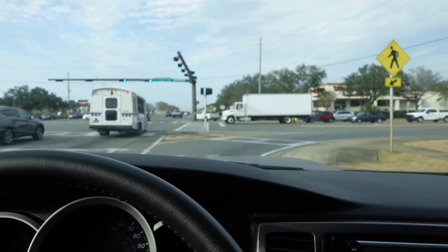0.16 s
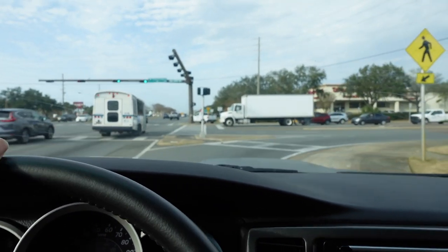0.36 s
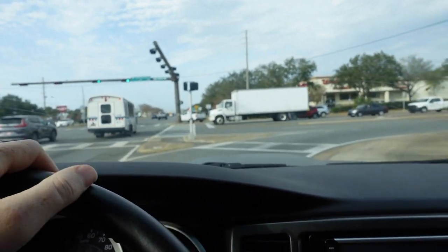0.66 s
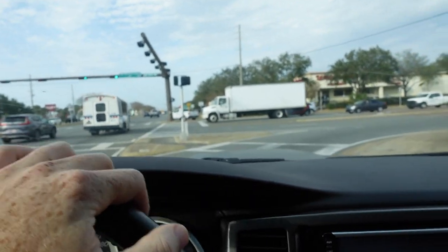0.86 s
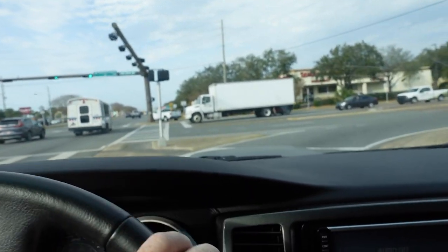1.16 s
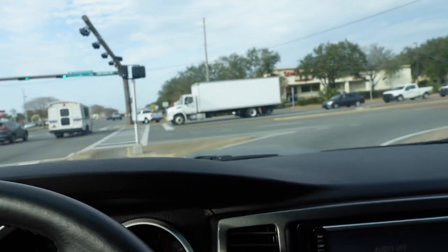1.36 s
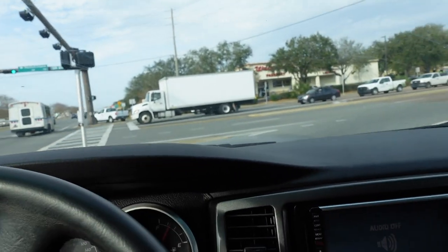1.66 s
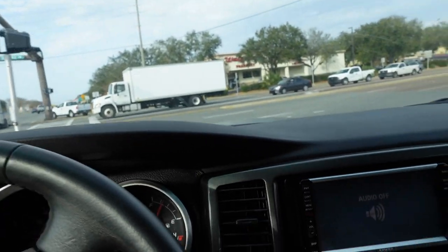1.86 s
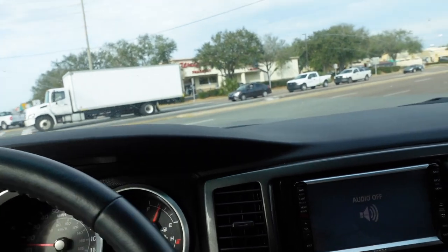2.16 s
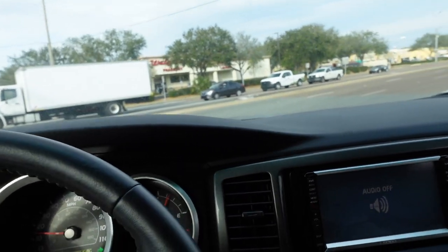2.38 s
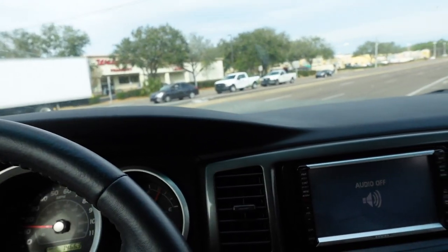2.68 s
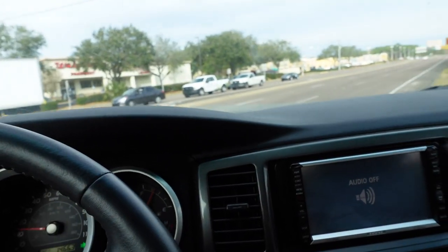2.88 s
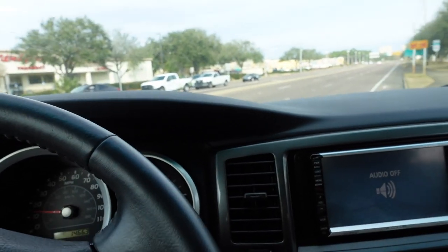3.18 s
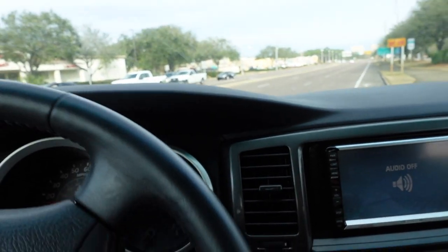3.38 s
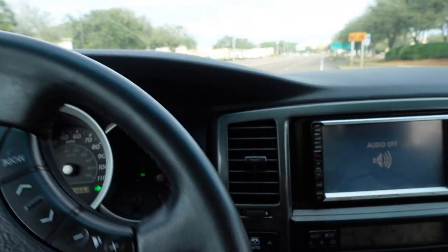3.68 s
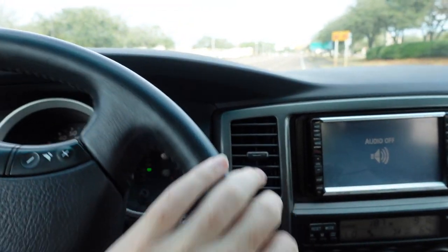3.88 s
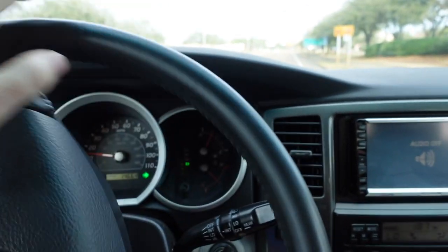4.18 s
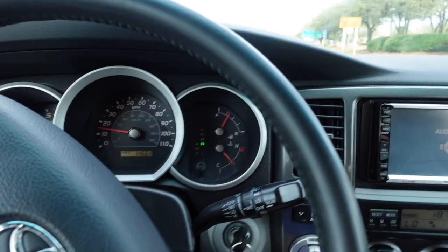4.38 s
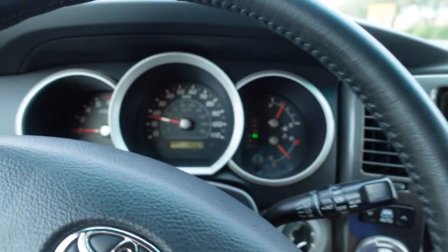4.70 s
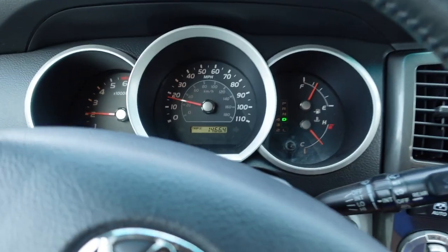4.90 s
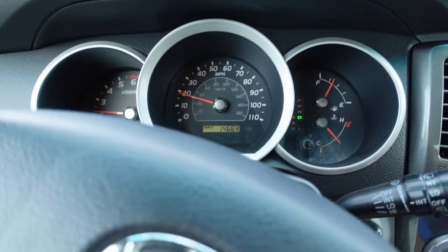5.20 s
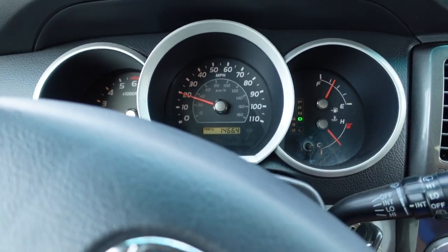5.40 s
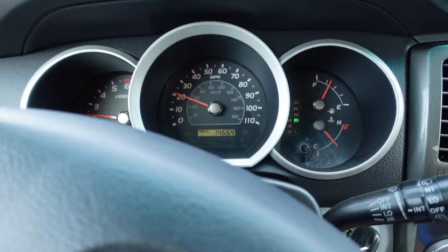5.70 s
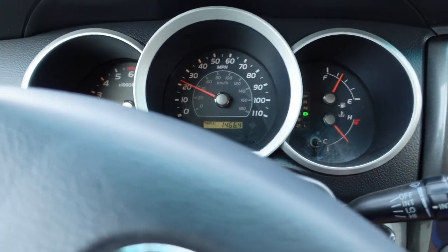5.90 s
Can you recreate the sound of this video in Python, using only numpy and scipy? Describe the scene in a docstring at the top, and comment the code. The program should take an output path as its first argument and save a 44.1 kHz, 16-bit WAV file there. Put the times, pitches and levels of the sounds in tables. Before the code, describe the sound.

Inside a truck cabin, close and dry, from the driver's seat. From 0 s a hand brushes the wheel over low road rumble and faint hiss; an indicator relay starts at 0.1 s, a light tick then a woodier tock, about three strokes per second. Small creaks follow, and a sharp, loud plastic click at 0.98 s. The vehicle slows, and the tyre hum dips in pitch but swells, wavering, around 2.7 s. Dull suspension knocks come from 1.7 to 2.5 s and at 3.4 s. From 3.3 s the V8 rises, a droning boom with thin air whistles. At 4.2 s growl catches; at 4.4 s the stalk snaps back in a rapid loud clatter, ticking ends, and the hand slides on the rim. Until 6 s the engine climbs steadily, throaty and uneven, with metallic valve noise, fluttering whistles, rising tread hum and occasional creaks.

```python
"""Truck cabin in a turn

Heard from the driver's seat of an eight-cylinder truck that slows into a turn and then pulls away.
Firing pulses ring exhaust, intake and metal and boom in the cabin; air whistles past the throttle plate.
Close tones make the tread hum, shaped noise the road, and short bursts with decaying modes the clicks:
the relay ticks until the steering cam snaps the stalk back, while a hand slides and creaks on the rim."""
import sys
import numpy as np
from scipy import signal
from scipy.fft import rfft, irfft, next_fast_len
from scipy.io import wavfile
from scipy.ndimage import uniform_filter1d

SR = 44100
rng = np.random.default_rng(int(sys.argv[2]) if len(sys.argv) > 2 else 0)


def wrap_up_sound(samples):
    """Save the sound to the file named by the first command line argument, as 16-bit audio."""
    columns = np.atleast_2d(samples).T
    # keep every value between -1 and 1, then stretch to whole-number steps
    tamed = np.clip(columns, -1, 1)
    steps = np.round(tamed * 32767).astype(np.int16)
    wavfile.write(sys.argv[1], SR, steps)


N = 266805
TIME = np.arange(N) / SR  # s

# Engine speed. Each row: time in seconds, firing rate in Hz.
ENGINE_SPEED = [(3.3, 100), (3.8, 109.5), (4.19, 113.5), (4.37, 137), (4.8, 145), (5.3, 154.6),
                (6.05, 166.4)]
# The truck slows and pulls away. Each row: time in seconds, road speed in m/s.
ROAD_SPEED = [(0, 8.7), (.7, 8.14), (1.75, 6.76), (3.2, 6.25), (4, 7.25), (5.25, 9.56), (6.05, 11.7)]
CANCEL_S = 4.39  # the indicator cancels


def engine():
    """Firing pulses ring pipes and metal, and the firing rate itself booms in the cabin."""
    rate_hz, = curves(ENGINE_SPEED)
    phase = np.cumsum(rate_hz) / SR  # in firings
    pulses = firing_pulses(phase)
    body = pipes(pulses) + boom(rate_hz, phase)
    # sound that goes round the cabin arrives from the side, a quarter wave late
    late = np.imag(signal.hilbert(body))
    return spread(body, late) + valve_gear(pulses, phase, rate_hz)


def firing_pulses(phase, jitter_ms=.045, drift_db=1.5):
    """Eight uneven cylinders fire in turn, each a little early or late and with a drifting strength."""
    # In firing order. Each row: strength in dB, travel time along the manifold in ms.
    cylinders = [(4.5, 1.02), (5.5, 1.03), (-0.5, 0.086), (5, 0.53), (2.5, 1.446), (6.5, 1.2), (6.5, 1.055),
                 (2, 0.033)]
    count = len(cylinders)
    firing = np.arange(int(phase[-1]) - 2)
    strength_db, lag_ms = np.array(cylinders)[firing % count].T
    lag_ms = np.abs(lag_ms + jitter_ms * rng.standard_normal(len(firing)))
    cycles = rng.standard_normal((len(firing) // count + 1, count))
    slow_drift = unit(uniform_filter1d(cycles, size=4, axis=0)).ravel()[firing]
    strength_db = strength_db + drift_db * slow_drift + rng.uniform(-1.2, 1.2, len(firing))
    at = (np.interp(firing, phase, TIME) + lag_ms / 1000).clip(0) * SR
    return unit(np.bincount(at.astype(int), undb(strength_db), N))


def pipes(pulses, gas=.16, surge_db=1.3):
    """Pulses and turbulent gas ring exhaust and intake; uneven combustion makes each pipe surge."""
    # Exhaust as it comes through the body. Each row: frequency in Hz, relative level in dB.
    exhaust = [(30, -23.5), (58, -14), (115, 0.5), (150, 0.5), (215, -6), (260, -1.5), (305, -12.5),
               (440, -15), (520, -18.5), (800, -15.5), (1300, -58.5)]
    # Standing waves of the exhaust pipe. Each row: frequency in Hz, relative level in dB.
    drone = [(240, -28.5), (305, -10.5), (336, 2.5), (358, -4), (385, -1), (440, -20), (560, -40.5)]
    # Intake growl. Each row: frequency in Hz, relative level in dB.
    intake = [(400, -43), (560, -16), (600, -18), (628, 3), (648, 2), (668, -5), (688, -9.5), (715, -10),
              (755, -18), (785, -16), (850, -23.5), (1000, -32.5), (1200, -53.5), (2500, -68)]
    # Growth of each voice, in order: idle level in dB, full-throttle level in dB at the reference
    # firing rate, power of the throttle, dB per octave of engine speed.
    exhaust_law = (-76, -47, 2.5, 15)
    drone_law = (-82, -46.5, 0.57, 4)
    intake_law = (-91, -42.5, 5.5, 15.5)
    # The growl catches in two steps. Each row: time in seconds, added level in dB.
    growl = [(4.18, -11), (4.215, 2), (4.288, -4.5), (4.305, 2), (4.45, -1.5), (4.7, -1.5), (4.95, -1)]
    growl_db, = curves(growl)
    drive = pulses + gas * rng.standard_normal(N)
    paths = [(exhaust, engine_gain(exhaust_law)),
             (drone, engine_gain(drone_law)),
             (intake, engine_gain(intake_law) * undb(growl_db))]
    out = 0
    for outline, gain in paths:
        surging = colour(drive, outline) * undb(surge_db * walk(28))
        out = out + unit(surging) * gain
    return out


def boom(rate_hz, phase):
    """A tone at the firing rate swells and thins as it sweeps through the air modes of the cabin."""
    # Air modes. Each row: frequency in Hz, width in Hz, relative level in dB.
    cabin_modes = [(114.1, 9.8, -36.5), (159.3, 18, -35.5)]
    # The seat lies in a node at one firing rate: its centre in Hz, width in Hz, depth in dB.
    cabin_node = (164.6, 1.1, 12)
    # Relative idle and full-throttle level in dB, power of the throttle, dB per octave of speed.
    boom_law = (-13, -1, 0.73, 1.5)
    power = 0
    for centre, width, db in cabin_modes:
        power = power + undb(db) ** 2 / (1 + (2 * (rate_hz - centre) / width) ** 2)
    node_hz, node_width, node_db = cabin_node
    cabin = np.sqrt(power) * undb(-node_db * bell(rate_hz, node_hz, node_width))
    tone = unit(np.sin(2 * np.pi * phase))
    return tone * cabin * engine_gain(boom_law) * undb(1.2 * walk(16))


def valve_gear(pulses, phase, rate_hz, air_db=-6, block_db=-2, block_rise=0.7):
    """Rushing air and ringing metal grow with the throttle; the metal rings out only under load."""
    # Valve gear and air rush. Each row: frequency in Hz, relative level in dB.
    valves = [(700, -23.5), (1300, 0.5), (1850, 7.5), (2100, 0), (2400, 6), (2700, 5), (3100, 4),
              (3500, -4), (4100, 2), (4600, -5), (6200, -11), (8000, -17.5), (13000, -13), (16000, -14)]
    # Idle and full-throttle level in dB, power of the throttle, dB per octave of engine speed.
    valve_law = (-82.5, -71.5, 3, 0)
    gain = engine_gain(valve_law)
    ringing = undb(block_db) * (gain / gain.max()) ** block_rise
    metal = block(pulses, phase, rate_hz) * ringing
    return (noise(valves) * undb(air_db) + metal) * gain


def block(pulses, phase, rate_hz, knock=0.81, clatter=0.42):
    """Valve knocks and rushing air ring the metal; each resonance swells near its best firing rate."""
    # Block and intake tract. Each row: frequency in Hz, width in Hz, relative level in dB,
    # firing rate in Hz that excites it most.
    resonances = [(923, 90, 13, 220), (1347, 68, 5, 97), (2320, 120, 2, 98), (2468, 95, 2.5, 150),
                  (3064, 120, 1, 151), (3640, 130, -4.5, 158), (4080, 54, 1, 160), (4230, 120, -13.5, 155),
                  (4670, 100, -9, 152), (5160, 120, -10, 152), (5950, 190, -6.5, 190),
                  (6640, 340, -14.5, 120), (8600, 300, -17.5, 158), (9250, 120, -18.5, 151),
                  (12500, 600, -18.5, 147)]
    detuned_db, detuned_hz = 2.5, 7.2  # loss far from the best firing rate, and the width of the peak
    swell_db, pitch_share = 2.5, .006  # rms wander of level and of pitch
    air = rng.standard_normal((2, N)) * (1 + clatter * np.cos(2 * np.pi * phase))
    drive = air + knock * pulses * np.array([[1], [0]])  # knocks in the mid only
    rung = 0
    for hz, width, db, best_hz in resonances:
        tuning_db = detuned_db * (bell(rate_hz, best_hz, detuned_hz) - 1)
        level = undb(db + tuning_db + swell_db * walk(6.9))
        rung = rung + ring(ring(drive, hz, width), hz, width) * level
    return spread(*unit(drift(rung, pitch_share)))


def engine_gain(law):
    """A voice of the engine grows from idle with the throttle and the engine speed."""
    reference_hz = 150
    idle_db, full_db, power, octave_db = law
    rate_hz, = curves(ENGINE_SPEED)
    full = undb(full_db + octave_db * np.log2(rate_hz / reference_hz))
    return undb(idle_db) + full * throttle() ** power


def throttle():
    """Opening from 0 to 1: each push of the pedal eases in and holds."""
    # Two pushes. Each row: start in seconds, length in seconds, relative share of the opening.
    pedal = [(3.317, 0.9, 0.87), (4.085, 0.28, 0.28)]
    opening = 0
    for s, length_s, share in pedal:
        push = np.clip((TIME - s) / length_s, 0, 1)
        opening = opening + share * np.sin(np.pi / 2 * push) ** 2
    return opening / opening.max()


def whistle(waver_hz=32, flutter_per_s=150):
    """Air whistles fitfully past the throttle plate: breathy tones swell, slide, waver and fade."""
    # Each row: start in seconds, length in seconds, middle pitch in Hz, slide in Hz, level in dB.
    whistles = [(3.448, .58, 3310, -93, -84.5), (3.55, 0.22, 2490, 42, -88),
                (3.85, 0.19, 2600, -150, -80.5), (4.5, .7, 4130, -49.5, -84.5),
                (4.83, 0.24, 3790, 121.5, -80), (4.884, 0.45, 2570, -120, -76),
                (4.9, 0.39, 3090, 99, -78.5), (4.984, 0.49, 5140, -59, -89), (5.5, .32, 6400, -77, -91.5),
                (5.72, .45, 5970, 29.5, -82.5), (5.604, 0.54, 3710, -32, -82),
                (5.702, 0.41, 2310, 103, -79.5)]
    tones = np.zeros((2, N))
    for s, length_s, hz, slide_hz, db in whistles:
        on = (TIME > s) & (TIME < s + length_s)
        age = (TIME[on] - s) / length_s
        pitch = hz + slide_hz * (age - .5) + waver_hz * walk(12)[on]
        flutter = walk(flutter_per_s)[on] + 1j * walk(flutter_per_s)[on]
        swell = undb(db) * np.sin(np.pi * age)
        tone = swell * flutter * np.exp(2j * np.pi * np.cumsum(pitch) / SR)
        tones[:, on] += np.array([tone.real, tone.imag])
    return spread(*tones)


def tyres(width=0.088, waver=0.73, pitch_spacing=.095):
    """Tread blocks of unequal length give a cluster of close tones that beat, waver and throb."""
    # Level in dB at turning speed, dB per doubling of speed, dB more in the corner,
    # dB more at full throttle.
    hum_law = (-49, 4.5, 8, 2)
    # The air in the tyres resonates at one tread pitch: centre in Hz, width in Hz, boost in dB.
    tyre_cavity = (186.2, 26, 4.2)
    tread_block_m = .054
    speed, = curves(ROAD_SPEED)
    tread_hz = speed / tread_block_m
    phase = np.cumsum(tread_hz) / SR
    hum = 0
    for offset in pitch_spacing * (np.arange(8) - 3.5):
        weight = 1 / (1 + (offset / width) ** 2)
        turns = phase * (1 + offset) + rng.random()
        hum = hum + weight * np.sin(2 * np.pi * turns + waver * walk(8))
    throb = undb(2.6 * walk(20))
    centre, span, cavity_db = tyre_cavity
    cavity = undb(cavity_db * bell(tread_hz, centre, span))
    return unit(hum * throb) * road_gain(hum_law) * cavity


def relay(first_s, level_db, body, modes, rise_s, t60_s, ring_db):
    """One stroke of the relay behind the dash clicks at every flash; the panel adds a woody knock."""
    # The knock fades as the microphone turns away: centre in Hz, width in Hz,
    # gain in dB at the start, change in dB per second.
    dash_knock = (624, 350, 5.5, -3.5)
    period_s = .6867
    out, path = np.zeros((2, N)), reflections()
    hz, width, start_db, fade_db = dash_knock
    for s in np.arange(first_s, CANCEL_S, period_s):
        pattern = path + 0.59 * reflections()  # a shared path, varied at each stroke
        stroke = undb(level_db) * click(pattern, body, rise_s, t60_s, modes=modes, ring_db=ring_db)
        knock_gain = undb(start_db + fade_db * s) - 1
        add(out, s, stroke + knock_gain * ring(stroke, hz, width))
    return out


def steering():
    """The cam flicks past its pawl, later throws the stalk back; the hand slides and creaks on the rim."""
    # Skin on the rim. Each row: frequency in Hz, relative level in dB.
    skin = [(700, -8), (2000, -11), (4000, -8), (7000, -1), (10000, -5), (15000, -11.5)]
    return hand_slides(skin) + stalk_clicks() + grip_creaks(skin)


def hand_slides(skin, grip_db=3.0):
    """Each slide of the rim through the hand swells and fades while the skin sticks and slips."""
    # Each row: start in seconds, length in seconds, level in dB, treble slope in dB per octave.
    slides = [(-.04, 0.24, -69, 2.5), (.22, 0.22, -89, 0), (1.7, 0.49, -78, -9), (4.293, 0.54, -62, -10),
              (4.417, 0.32, -79, 7), (4.768, .14, -78, 4), (5.118, 0.14, -80, 4.5)]
    out = np.zeros((2, N))
    for s, length_s, db, slope_db in slides:
        swell = np.sin(np.pi * np.clip((TIME - s) / length_s, 0, 1))
        out += noise(skin, slope_db) * swell * undb(db + grip_db * walk(160))
    return out


def stalk_clicks():
    """The cancelling cam clicks past its pawl, and the stalk knocks and snaps back."""
    # Cam, then stalk. Each row: start in seconds, level in dB, decay t60 in seconds,
    # treble slope in dB per octave, left minus right in dB, ringing in dB.
    pawl = [(0.979, -36.5, 0.048, 2.5, 0, -8.5), (.9895, -43.5, 0.047, -0.5, 0, -13),
            (1.032, -74, 0.018, -5, -5, -16)]
    stalk = [(1.723, -53.5, 0.037, -6.5, -3, -21), (2.973, -66.5, .05, -5.5, -2, -4.5),
             (4.380, -44.5, 0.03, -1, -2, -14), (4.388, -53, 0.032, -2, 1, 1),
             (4.3938, -33, 0.045, -0.7, -1.5, -9), (4.406, -36.5, 0.044, -4.5, -3, -14),
             (4.416, -36, 0.055, -3, -0.5, -7.5), (4.427, -34, 0.066, -5.5, -2, -14),
             (4.436, -58, 0.44, -2.5, -4, -10), (4.504, -38.5, 0.081, -7.5, -2, -10),
             (4.541, -58, 0.14, -6, -4, -4), (4.641, -54.5, .08, -6.5, -4, -6),
             (4.662, -52.5, 0.053, -8.5, -2, -7)]
    # Plastic of the stalk. Each row: frequency in Hz, relative level in dB.
    stalk_body = [(200, -7.5), (550, 9), (1000, -1.5), (1750, 2.5), (2200, 2.5), (2900, 2.5), (4200, 4.5),
                  (5400, 0.5), (7500, -2), (10000, -4), (14000, -7.5), (16000, -19)]
    # Ringing of the pawl, and of stalk and column shroud. Each row: frequency in Hz,
    # relative level in dB, t60 in seconds.
    pawl_modes = [(1500, -9.5, 0.1), (2690, -8, 0.044), (3020, 0, 0.077), (3750, -19, 0.096),
                  (4440, -3, 0.085), (5120, -7, 0.06), (5588, -19, 0.067), (7360, -21, 0.048),
                  (8457, -15, 0.052), (8700, -19, 0.078), (9792, -15, 0.056), (9900, -12, 0.056)]
    stalk_modes = [(546, -15, 0.1), (1280, -9, 0.05), (1523, -2, 0.11), (1820, 4, 0.063),
                   (2020, -11, 0.055), (2530, -6, 0.042), (2900, -9, 0.09), (3214, 6.5, 0.05),
                   (3758, -9, .07), (4300, -2, .09), (4470, -1.5, 0.07), (4550, 1, 0.044), (5670, -4, 0.07),
                   (5930, -3, 0.08), (6900, -3, .07), (8120, -2, 0.061), (10600, 1, 0.05)]
    out = np.zeros((2, N))
    for s, db, t60_s, slope_db, pan_db, ring_db in pawl:
        snap = click(reflections(grain=0.17, count=32), stalk_body, 0.0043, t60_s, slope_db, pan_db,
                     modes=pawl_modes, ring_db=ring_db, tail_db=-36, tail_t60_s=0.5)
        add(out, s, undb(db) * snap)
    for s, db, t60_s, slope_db, pan_db, ring_db in stalk:
        snap = click(reflections(grain=0.36, count=64), stalk_body, 0.0045, t60_s, slope_db, pan_db,
                     modes=stalk_modes, ring_db=ring_db, tail_db=-30.0, tail_t60_s=0.62)
        add(out, s, undb(db) * snap)
    return out


def grip_creaks(skin, slip_s=.019, fade_db_per_s=95):
    """The grip creaks in single slips or a short fading run of them."""
    # Each row: start in seconds, length in seconds, level of the first slip in dB,
    # treble slope in dB per octave.
    creaks = [(0.316, .09, -67, -2), (0.486, .01, -71.5, -4), (0.874, .01, -59.5, -9),
              (3.313, .01, -75, -2), (3.814, .01, -65.5, -5.5), (4.088, .01, -72, -5),
              (4.144, .01, -63.5, -6), (4.277, .01, -63.5, -7), (4.720, .01, -64.5, -2),
              (5.127, .01, -72, -2), (5.87, .01, -65.5, -6)]
    out = np.zeros((2, N))
    for s, length_s, db, slope_db in creaks:
        for lag in np.arange(0, length_s, slip_s):
            slip = click(reflections(), skin, rise_s=0.0007, t60_s=0.037, slope_db=slope_db)
            add(out, s + lag, undb(db - fade_db_per_s * lag) * slip)
    return out


def jolts():
    """The suspension passes each seam in the road on as a dull knock."""
    # Each row: start in seconds, level in dB, decay t60 in seconds, treble slope in dB per octave.
    seams = [(1.694, -49, 0.49, 0.5), (1.769, -48.5, 0.21, 0), (1.863, -49.5, 0.36, 3),
             (2.02, -50, 0.079, -4), (2.108, -51.5, 0.079, 2.5), (2.27, -50.5, 0.31, 0),
             (2.345, -45, .07, -3.5), (2.462, -50.5, 0.27, 1), (3.37, -48, 0.29, -1.5)]
    # Body of the truck. Each row: frequency in Hz, relative level in dB.
    jolt_body = [(120, 0.5), (200, 7), (260, 2), (310, -3.5), (380, 5.5), (480, -15), (620, -10.5),
                 (800, -16.5), (1100, -31), (3000, -43.5)]
    out = np.zeros((2, N))
    for s, db, t60_s, slope_db in seams:
        knock = click(reflections(), jolt_body, rise_s=0.006, t60_s=t60_s, slope_db=slope_db)
        add(out, s, undb(db) * knock)
    return out


def road(flutter_db=1.5):
    """The road surface shakes the body and rushes in the wheel wells."""
    # Body shake, then wheel wells. Each row: frequency in Hz, relative level in dB.
    rumble_outline = [(20, -25.5), (40, -14.5), (60, -5), (80, -5), (115, 4.5), (180, 1), (240, -6.5),
                      (300, -12.5), (380, -19), (470, -33.5), (800, -47.5)]
    rush_outline = [(150, 6), (380, 4.5), (500, -2.5), (650, -1.5), (1050, -11.5), (1500, -18.5),
                    (3000, -27.5), (5000, -34.5), (8000, -39.5), (15000, -42)]
    # Level in dB at turning speed, dB per doubling of speed, dB more in the corner,
    # dB more at full throttle.
    rumble_law = (-51, 5, 0, 4.5)
    rush_law = (-64.5, 10, 0, 1)
    rumble = noise(rumble_outline) * road_gain(rumble_law) * undb(flutter_db * walk(9))
    rush = noise(rush_outline) * road_gain(rush_law) * undb(flutter_db * walk(14))
    return rumble + rush


def heave():
    """The body sways on its springs, a low noise that grows in the corner and on pulling away."""
    # Each row: frequency in Hz, relative level in dB.
    heave_body = [(20, -11.5), (35, -5.5), (52, 5.5), (65, 5), (85, -19.5)]
    # Level in dB at turning speed, dB per doubling of speed, dB more in the corner,
    # dB more at full throttle.
    heave_law = (-71, 4.5, 6.5, 4.5)
    return noise(heave_body) * road_gain(heave_law)


def road_gain(law):
    """A voice of the road grows with speed, with cornering and with the pull on the wheels."""
    turn_m_s = 6.2
    corner_s, corner_width_s = 2.695, 0.71  # the tightest part of the turn
    base_db, doubling_db, corner_db, pull_db = law
    speed, = curves(ROAD_SPEED)
    speed_db = doubling_db * np.log2(speed / turn_m_s)
    cornering_db = corner_db * bell(TIME, corner_s, corner_width_s)
    return undb(base_db + speed_db + cornering_db + pull_db * throttle())


def click(pattern, body, rise_s, t60_s, slope_db=0, pan_db=0, modes=(), ring_db=-9, side_db=-3,
          tail_db=-28, tail_t60_s=0.25):
    """A snap whose dense reflections build up and die quickly in the padded cabin, over ringing modes."""
    t = np.arange(pattern.shape[-1]) / SR
    decay = undb(-60 * np.maximum(t - rise_s, 0) / t60_s)
    tail = undb(tail_db - 60 * t / tail_t60_s)
    envelope = np.minimum(t / rise_s, 1) * (decay + tail)
    sound = unit(colour(pattern, body, slope_db)) * envelope
    for hz, db, t60 in modes:
        # a soft contact reaches the high modes less
        softness_db = min(slope_db, 0) * np.log2(hz / 1000)
        gain = undb(db + ring_db + softness_db - 60 * t / t60)
        tone = np.sin(2 * np.pi * (hz * t + rng.random((2, 1))))
        sound = sound + gain * np.minimum(2 * t / rise_s, 1) * tone
    return spread(sound[0], sound[1] * undb(side_db), pan_db)


def reflections(size=8192, grain=0.47, count=16):
    """A random pattern of cabin reflections, some much stronger than the rest; mid and side."""
    # each run of count samples shares one strength
    strength = np.repeat(np.exp(grain * rng.uniform(-2, 2, size // count)), count)
    return unit(rng.standard_normal((2, size)) * strength)


def noise(points, slope_db=0):
    """Diffuse cabin noise of a given colour, from mid and side of rms 1."""
    return spread(*unit(colour(rng.standard_normal((2, N)), points, slope_db)))


def spread(mid, side, pan_db=0):
    """Two channels: alike in the bass, less so in the treble."""
    # Unlikeness of the channels. Each row: frequency in Hz, side minus mid in dB.
    side_outline = [(60, -40.5), (125, -48.5), (200, -28.5), (380, -22), (700, -17), (1300, -9),
                    (2400, -8.5), (4400, -7.5), (10000, -3), (16000, -10.5)]
    side = shade(side, side_outline)
    return np.array([(mid + side) * undb(pan_db / 2), (mid - side) * undb(-pan_db / 2)])


def colour(x, points, slope_db=0):
    """Causal filter with the given (Hz, dB) outline and an extra slope per octave."""
    size = next_fast_len(x.shape[-1] + 4096, True) // 2 * 2
    octave = np.log2(np.maximum(np.fft.rfftfreq(size, 1 / SR), 1))
    hz, db = np.transpose(points)
    below = np.maximum(np.log2(hz[0]) - octave, 0)
    above = np.maximum(octave - np.log2(hz[-1]), 0)
    # beyond the outline the level falls by 18 dB per octave
    outline = np.interp(octave, np.log2(hz), db) + slope_db * octave - 18 * (below + above)
    # folding the cepstrum gives minimum phase
    cepstrum = irfft(np.log(undb(outline)))
    cepstrum[1:size // 2] *= 2
    cepstrum[size // 2 + 1:] = 0
    return irfft(rfft(x, size) * np.exp(rfft(cepstrum)))[..., :x.shape[-1]]


def shade(x, points, share=1):
    """Weight a sound by a (Hz, dB) outline without delaying it."""
    hz, db = np.transpose(points)
    log_hz = np.log(np.fft.rfftfreq(len(x), 1 / SR) + 1)
    gain = undb(share * np.interp(log_hz, np.log(hz), db))
    return irfft(rfft(x) * gain, len(x))


def ring(x, hz, width_hz):
    """One resonance, gain 1 at its centre."""
    return signal.lfilter(*signal.iirpeak(hz, hz / width_hz, SR), x)


def drift(x, share):
    """Let the pitch of both channels wander by a small share."""
    place = np.arange(N)
    wander = share * walk(7)
    moved = place + np.cumsum(wander - wander.mean())
    return np.array([np.interp(moved, place, channel) for channel in x])


def walk(rate):
    """Smooth random wander about 0, rms 1, with the given number of steps per second."""
    k = int(SR / rate)
    steps = rng.standard_normal(1024)[np.arange(N) // k % 1024]
    return unit(uniform_filter1d(uniform_filter1d(steps, k), k))


def bell(x, centre, width):
    """1 at the centre, falling smoothly to 0 on both sides."""
    return np.exp(-((x - centre) / width) ** 2)


def curves(table):
    """Each column of a table, joined by straight lines in time."""
    s, *columns = np.transpose(table)
    return [np.interp(TIME, s, c) for c in columns]


def undb(db):
    """Decibels to gain."""
    return 10 ** (np.asarray(db) / 20)


def unit(x):
    """Scale to rms 1."""
    return x / np.sqrt(np.mean(x ** 2))


def add(out, s, sound):
    """Mix a sound in at time s."""
    start = max(int(s * SR), 0)
    out[:, start:start + sound.shape[1]] += sound[:, :N - start]


def scene():
    """Everything heard from the driver's seat, over a faint even hiss."""
    # Colour of the relay's two strokes and of the hiss. Each row: frequency in Hz, relative level in dB.
    tick_body = [(400, 12), (630, -7), (900, -3.5), (1550, -5.5), (1900, -12), (2500, 2.5), (2950, -4.5),
                 (3400, -5), (5000, -14.5), (6700, -4.5), (7150, -24), (7800, -7.5), (8800, -27),
                 (10200, -8), (11800, -15), (13300, -9), (14500, -12), (16000, -41.5)]
    tock_body = [(350, -37), (630, 17.5), (970, -18.5), (1250, 6.5), (1450, -16), (1680, 3), (1950, -8.5),
                 (2950, -4), (3800, -18), (6500, -18), (10000, -20.5), (15000, -46)]
    hiss_outline = [(1000, 0), (6000, 3), (13500, -3), (15800, -14)]
    # Relay case and dash panel ringing. Each row: frequency in Hz, relative level in dB, t60 in seconds.
    tick_modes = [(640, -7, 0.041), (1677, -3.5, 0.073), (2393, 2, 0.047), (2530, -2, 0.05),
                  (2810, -11.5, 0.07), (3230, -2, 0.047), (3640, -15, .05), (6400, -6, .05),
                  (6940, -6.5, .055), (7850, -12, 0.042), (9950, -9, .05), (10990, -12, .05)]
    tock_modes = [(562, 14, 0.047), (1146, -2.5, 0.081), (1353, 3.5, 0.039), (1656, -2.5, 0.064),
                  (2130, -16, .05), (2500, -12, 0.054), (2985, 1, .05), (2970, -8.5, 0.032),
                  (3750, -8, 0.072), (5680, -10.5, 0.06), (6560, -11, .055), (7100, -20, 0.041),
                  (7600, -25, 0.042), (9280, -23, 0.046), (9900, -17, .05)]
    blink_start_s, lamp_on_s = .1, .3433  # first stroke, time that the lamp stays lit
    ticks = relay(blink_start_s, -58, tick_body, tick_modes, rise_s=0.004, t60_s=0.061, ring_db=-4.5)
    tocks = relay(blink_start_s + lamp_on_s, -51, tock_body, tock_modes,
                  rise_s=0.0062, t60_s=0.053, ring_db=-10.0)
    hiss = undb(-90.5) * noise(hiss_outline)
    vehicle = engine() + whistle() + tyres() + road() + heave() + jolts()
    return vehicle + ticks + tocks + steering() + hiss


def record(dry):
    """The left channel is brighter than the right, and nothing sounds above 15.7 kHz."""
    # The right port of the microphone is shaded. Each row: frequency in Hz, left minus right in dB.
    port_shade = [(20, 0), (700, 0), (1300, .8), (2400, 2.6), (4400, 3.4), (8000, 4.4), (15000, 3)]
    top_hz = 15700
    ports = np.array([shade(dry[0], port_shade, .5), shade(dry[1], port_shade, -.5)])
    return signal.sosfilt(signal.ellip(8, .2, 70, top_hz, fs=SR, output="sos"), ports)


dry = scene()
out = record(dry)
wrap_up_sound(out)
```